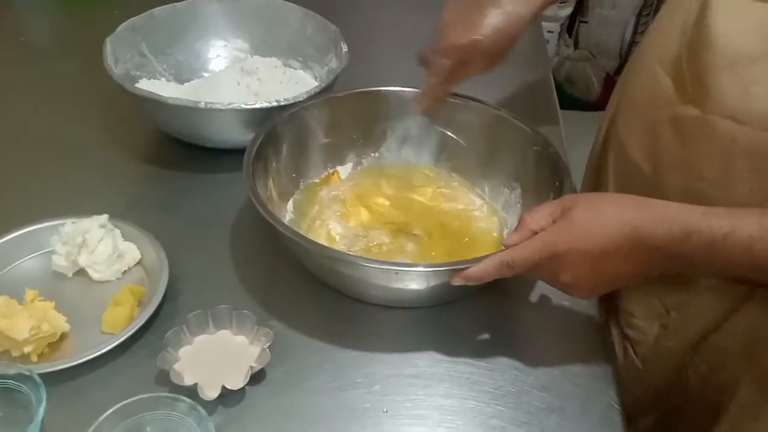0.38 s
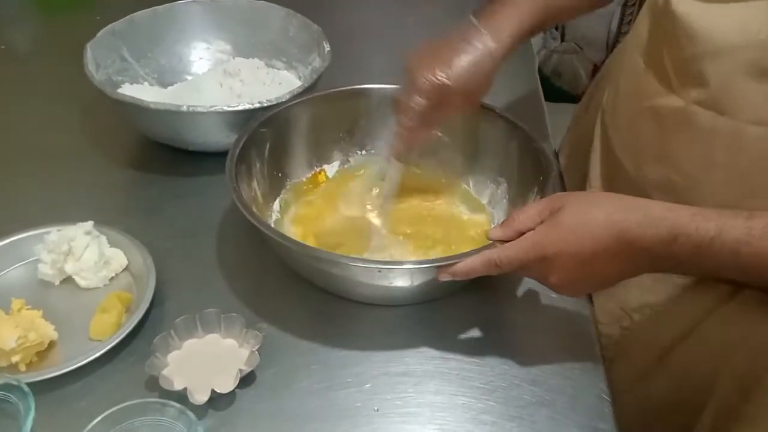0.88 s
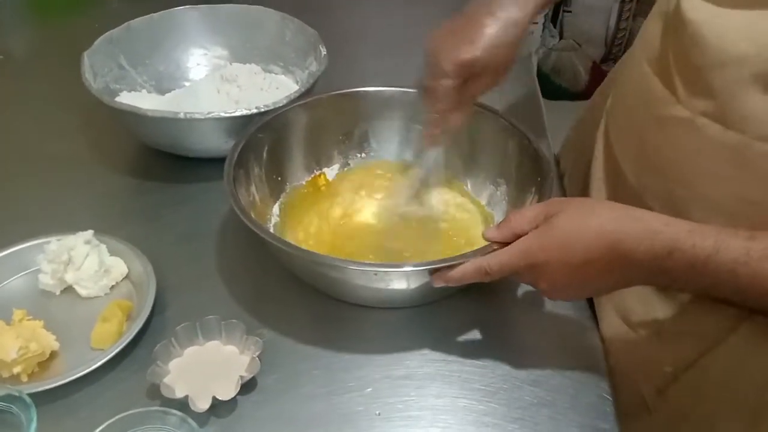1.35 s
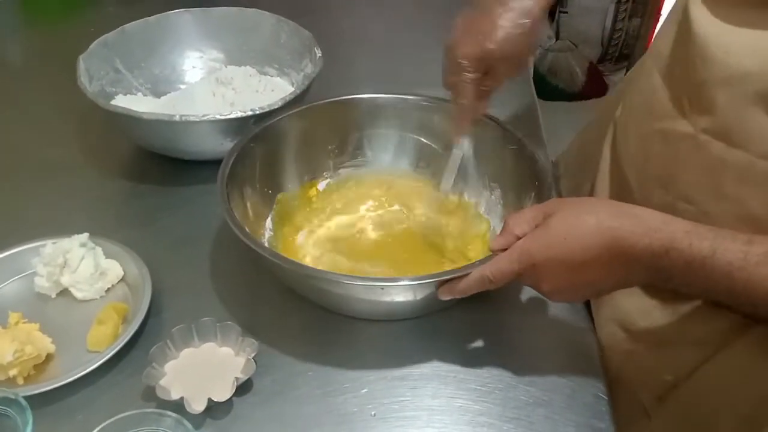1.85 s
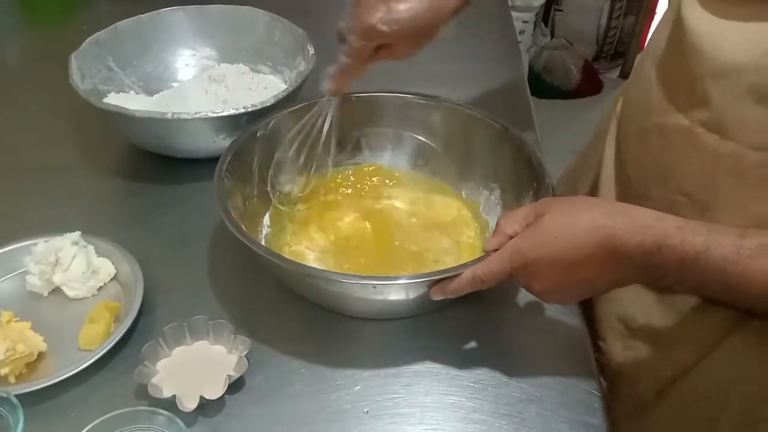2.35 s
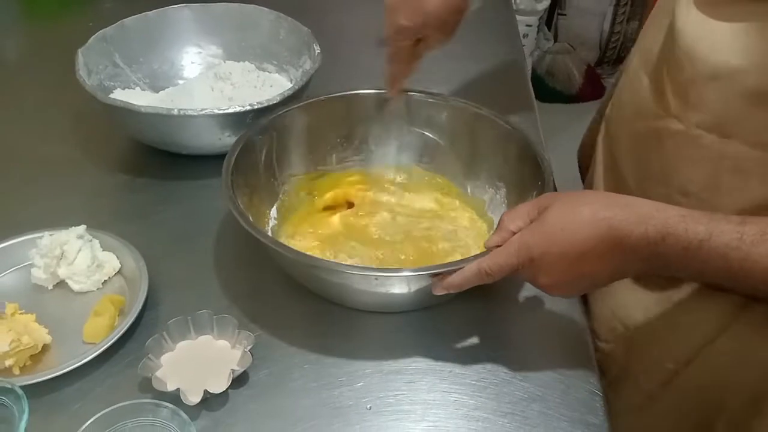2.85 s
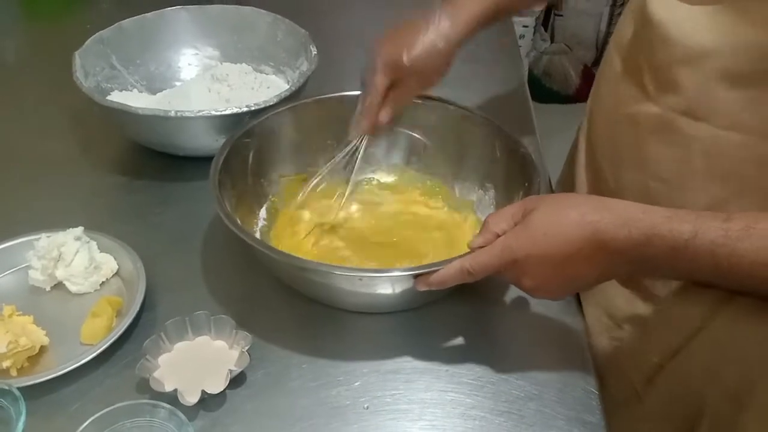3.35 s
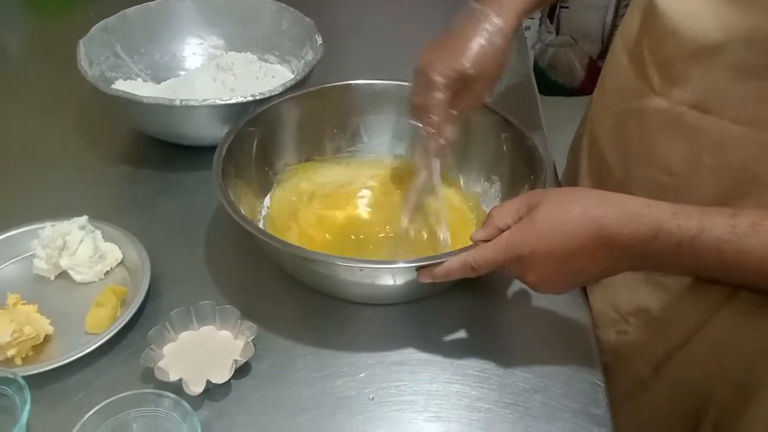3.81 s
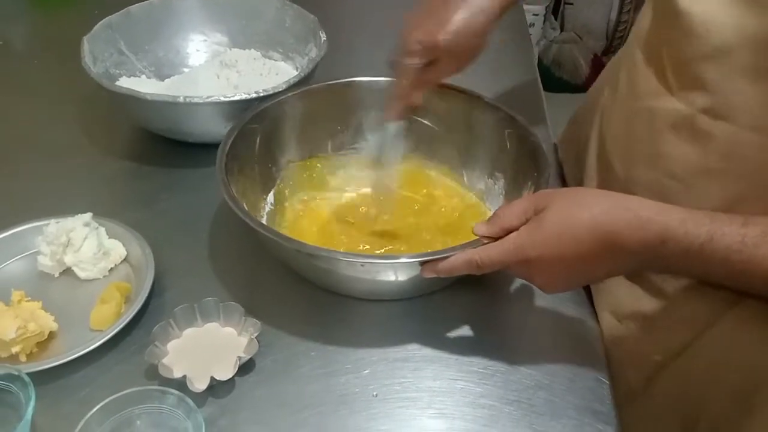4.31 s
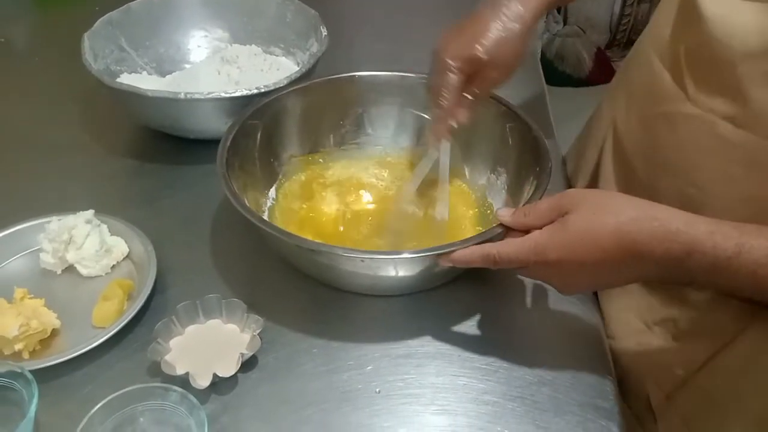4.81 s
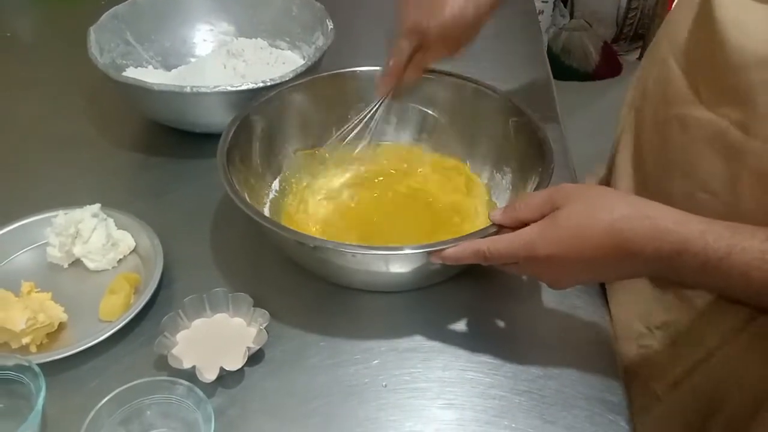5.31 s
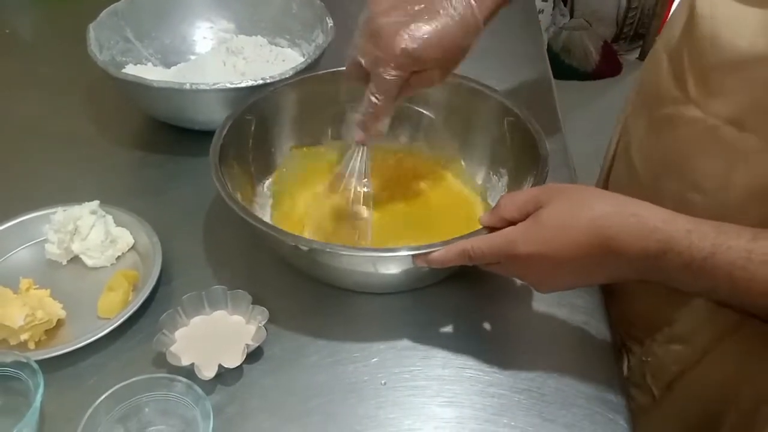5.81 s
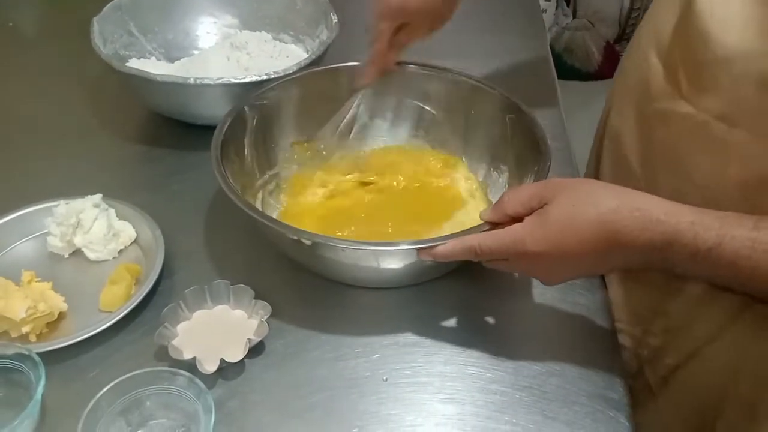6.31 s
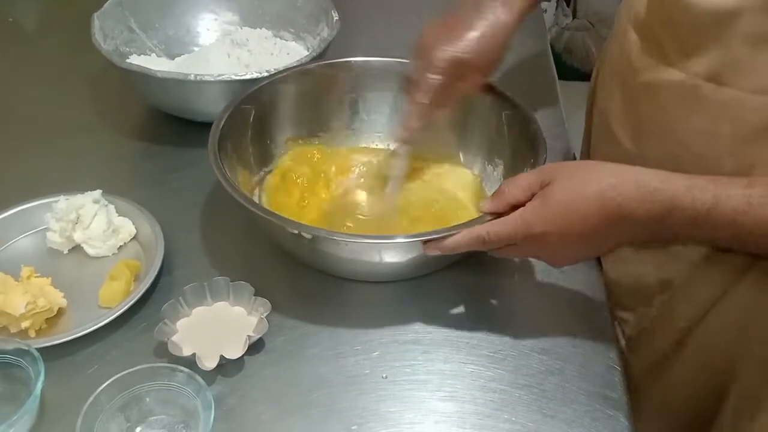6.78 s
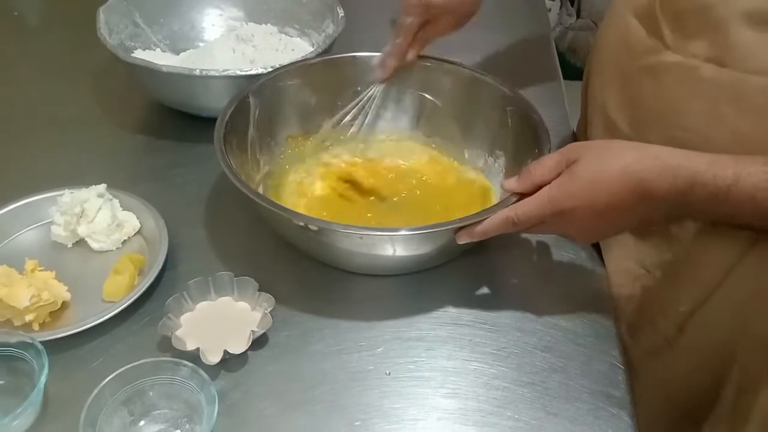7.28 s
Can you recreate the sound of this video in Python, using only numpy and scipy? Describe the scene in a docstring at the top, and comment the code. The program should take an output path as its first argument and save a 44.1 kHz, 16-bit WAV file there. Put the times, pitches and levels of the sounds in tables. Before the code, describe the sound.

Rapid close whisking in a metal bowl, wet slosh and bright ringing ticks, with a low engine swelling up in the last seconds.

```python
"""A wire whisk beats eggs fast in a steel bowl held on a steel table, heard close up.
Its wires hiss (shaped noise) and tick along the wall and knock it, setting short resonant modes ringing;
dragging wires sing, the egg sloshes and surges, and a few notes of the bowl stand out.
Something squeaks thinly (a sine and its octave) over a room murmur, and outside a slow engine idles,
then revs and swells as it comes by: pulses and noise through exhaust and pipe resonances."""
import sys
import numpy as np
from scipy import signal
from scipy.fft import rfft, irfft, next_fast_len
from scipy.io import wavfile
from scipy.ndimage import uniform_filter1d

SR = 44100
rng = np.random.default_rng(int(sys.argv[2]) if len(sys.argv) > 2 else 0)


def undo_db(level):
    """Turn decibels back into plain size, where 20 dB means ten times bigger."""
    steps = np.asarray(level, float) / 20
    return 10 ** steps


def put_to_file(sound):
    """Save the sound as 16-bit audio at rate SR, in the file named by the first command-line argument."""
    columns = np.atleast_2d(sound).T  # one column per channel
    safe = np.clip(columns, -1, 1)
    whole_steps = np.round(safe * 32767)
    wavfile.write(sys.argv[1], SR, whole_steps.astype(np.int16))


N = 326781  # samples

# Knocks of the wires on the wall: [t/s, relative level/dB, lower ring f/Hz, upper ring f/Hz,
# how long the wires keep landing/s (held within 0.002 to 0.025)]
KNOCK_EVENTS = [(0.061, -8.5, 4230, 5860, 0.0054), (0.075, -15, 4230, 5630, 0.0051),
                (0.125, -7.5, 4900, 6420, 0.0052), (0.187, -16, 4600, 4880, 0.031),
                (0.234, -17.5, 1860, 3340, 0.0091), (0.332, -11.5, 4540, 5160, 0.011),
                (0.529, -11.5, 4020, 7740, 0.022), (0.5397, -12.5, 2360, 5670, 0.011),
                (1.671, -12, 4120, 6080, 0.012), (1.7686, -13.5, 4330, 5720, 0.015),
                (1.785, -11.5, 4260, 5770, 0.023), (1.8686, -13, 3830, 4900, 0.0037),
                (2.0702, 5.5, 3570, 5060, 0.0062), (2.331, -6, 5060, 5670, 0.022),
                (2.419, -16, 4270, 5300, 0.03), (2.446, -13.5, 4000, 5860, 0.033),
                (2.5807, 2.5, 5540, 6130, 0.007), (2.628, -13, 4340, 6400, 0.0028),
                (2.64, -6, 4030, 5900, 0.0069), (2.715, -14.5, 3870, 5450, 0.015),
                (2.764, -6, 4420, 5640, 0.033), (2.866, -34, 4300, 7600, 0.0036),
                (2.8966, -13.5, 4530, 5630, 0.03), (2.9274, -11.5, 2780, 6350, 0.034),
                (3.007, -13, 3660, 5270, 0.004), (3.078, -12, 3330, 8800, 0.0059),
                (3.108, -16, 3360, 5500, 0.0064), (3.135, -15.5, 5160, 5200, 0.014),
                (3.7505, -12.5, 2287, 5270, 0.0094), (3.929, -8, 4300, 5320, 0.0018),
                (3.971, -10.5, 4030, 8000, 0.004), (4.0915, -14, 3050, 5700, 0.0039),
                (4.101, -11.5, 3050, 3960, 0.0022), (4.2207, -18, 3300, 5050, 0.015),
                (5.1115, -13.5, 3670, 5200, 0.0037), (5.217, -14, 4470, 5430, 0.0095),
                (5.365, -6.5, 5100, 5200, 0.023), (5.383, -6, 5070, 8180, 0.012),
                (5.7175, -6.5, 4240, 5000, 0.01), (5.7307, 0.5, 4250, 8200, 0.0062),
                (5.7392, 1, 4300, 5250, 0.0071), (5.746, 0, 3150, 5250, 0.0071),
                (5.956, -9, 4490, 4890, 0.0041), (6.001, -6, 6260, 7650, 0.0065),
                (6.028, -10.5, 5360, 5400, 0.025), (6.049, -10, 4850, 5100, 0.0094),
                (6.063, -13, 4220, 5700, 0.0073), (6.129, -22, 3040, 4940, 0.01),
                (6.264, -12, 5350, 5860, 0.027), (6.301, -11.5, 5050, 5760, 0.0075),
                (6.4357, -15, 4075, 5660, 0.01), (6.742, -16, 3050, 4800, 0.0051),
                (6.81, -6.5, 5240, 5580, 0.0041), (7.233, -14.5, 1960, 5170, 0.0051),
                (7.341, -15, 1850, 5130, 0.017), (7.383, -16, 4100, 4850, 0.036)]
# Small patches of wall radiate little bass: [f/Hz, level/dB]
SMALL_PATCH = [(900, -26), (2700, 0)]


def evened(x):
    """Scaled to rms 1."""
    return x / np.sqrt(np.mean(x ** 2) + 1e-20)


def read(points, hz):
    """A spectrum table read on a log-frequency axis."""
    f, value = np.transpose(points)
    return np.interp(np.log(hz + 1), np.log(f + 1), value)


def coloured(x, points):
    """x filtered by a spectrum table."""
    size = next_fast_len(len(x) + 4096)
    gain = undo_db(read(points, np.fft.rfftfreq(size, 1 / SR)))
    return irfft(rfft(x, size) * gain, size)[:len(x)]


def ring(x, hz, width):
    """A two-pole resonance, width in Hz: an impulse of 1 rings with height 1."""
    r, w = np.exp(-np.pi * width / SR), 2 * np.pi * hz / SR
    return signal.lfilter([np.sin(w)], [1, -2 * r * np.cos(w), r * r], x)


def sway(x, hz, width):
    """A resonance whose pitch follows the curve hz: an impulse of 1 rings with height 1."""
    turn = np.exp(2j * np.pi * np.cumsum(hz) / SR)
    return (turn * signal.lfilter([1], [1, -np.exp(-np.pi * width / SR)], x / turn)).real


def wander(seconds):
    """Random values of spread 1, a new one every so many seconds, joined by lines."""
    return np.interp(np.arange(N) / SR / seconds, np.arange(2000), rng.standard_normal(2000))


def murmur(db=-42):
    """The room's murmur: steady coloured noise."""
    # Murmur spectrum: [f/Hz, relative level/dB]
    room_colour = [(15, -58), (25, -10), (107, 4), (308, 5), (981, -8), (1820, 4), (2500, -9), (4300, 10),
                   (7960, -6), (9000, 1), (11700, -36.5), (19800, -120)]
    return undo_db(db) * evened(coloured(rng.standard_normal(N), room_colour))


def kitchen(x, db=-12, t60=0.18):
    """Sparse reflections of random sign, one in every 20 samples, falling 60 dB in t60 seconds."""
    taps = np.zeros(SR // 2)
    at = np.arange(200, len(taps) - 20, 20)
    sign = rng.choice([-1, 1], len(at))
    taps[at + rng.integers(0, 20, len(at))] = sign * undo_db(-60 * at / SR / t60)
    return undo_db(db) * signal.fftconvolve(x, taps / np.linalg.norm(taps))[:N]


def engine(pipe_hz=800, pipe_width=75, waver=0.026):
    """A strong and a weak puff each cycle thump in the exhaust; the gas whistles breathily in the pipe."""
    # Engine levels: [t/s, thump level/dB, upper thump share/dB as it nears, pipe whistle level/dB]
    engine_levels = [(0, -50.5, -15, -74), (1.0, -56, -12, -68), (3.0, -47, -14, -60),
                     (4.65, -49.5, -6.5, -58), (5.0, -46.5, 10.5, -71), (5.35, -44, 14, -43),
                     (5.75, -39, 12, -40), (6.2, -38, -3, -36.5), (6.6, -39, -2, -41),
                     (6.9, -38.5, -5, -67), (7.41, -46, -10.5, -68)]
    # Idling, then revved: [t/s, cycle rate f/Hz]
    cycle_rate = [(0, 5.14), (4.75, 5.14), (5.0, 18.8), (5.6, 18.7), (5.8, 18.4), (7.41, 18.7)]
    # Exhaust resonances, lowest first, then the upper ones: [f/Hz, width/Hz, relative level/dB]
    exhaust_modes = [(106, 48, 0), (140, 50, 0), (185, 60, -6), (235, 60, -11)]
    t = np.arange(N) / SR
    s, *columns = np.transpose(engine_levels)
    thump_db, upper_db, pipe_db = (np.interp(t, s, c) for c in columns)
    rate = np.interp(t, *np.transpose(cycle_rate))
    halves = np.floor(2 * (np.cumsum(rate * (1 + .02 * wander(.15))) / SR + .96))  # two puffs a cycle
    uneven_db = -.85 * rate * (halves % 2) + 2.5 * rng.standard_normal(N)  # no two firings alike
    puffs = evened(np.diff(halves, prepend=1) * undo_db(uneven_db))
    gas = (.35 + .03 * rate) * rng.standard_normal(N)  # more gas at speed
    # soft puffs; an open pipe gives no deep bass
    drive = np.diff(uniform_filter1d(puffs + gas, size=140), n=2, prepend=[0, 0])
    low, *upper = (undo_db(db) * evened(ring(ring(drive, hz, width), hz, width))
                   for hz, width, db in exhaust_modes)
    pipe = rng.standard_normal(N)
    drift = pipe_hz * (1 + waver * wander(.12))
    pipe = sway(sway(pipe, drift, pipe_width), drift, pipe_width)
    thump = low + undo_db(upper_db) * evened(sum(upper))
    return undo_db(thump_db + 2.7 * wander(.07)) * thump + undo_db(pipe_db) * evened(pipe)


def squeaks(hz=1812, octave_db=-13, waver_db=3, waver_hz=8, grow_db=4, rise_s=0.038, fall_s=0.035):
    """A thin whistle that grows a little and stops, with a weaker octave."""
    # Squeaks: [start t/s, length/s, level towards the end/dB]
    squeak_events = [(0.034, .1, -32), (1.002, 0.26, -30), (2.416, 0.16, -35)]
    level = np.zeros(N)
    for s, length, db in squeak_events:
        t = np.arange(0, length, 1 / SR)
        edges = np.clip(np.minimum(t / rise_s, (length - t) / fall_s), 0, 1)
        level[round(s * SR):][:len(t)] = undo_db(db + grow_db * (t / length - 1)) * edges ** 2.2
    turn = 2 * np.pi * np.cumsum(hz + waver_hz * wander(0.11)) / SR
    tone = np.sin(turn) + undo_db(octave_db) * np.sin(2 * turn)
    return np.sqrt(2) * level * undo_db(waver_db * wander(0.047)) * tone


def stroke_db(hz, t):
    """The stroke's level at one frequency: the sweeps rise, fall and add up; wall, body and slosh blend."""
    # Sweeps of the whisk round the bowl: [peak t/s, time to fall 10 dB/s (at least 0.005),
    # wires on the wall level/dB, bowl body level/dB, low slosh level/dB]
    sweep_events = [(.08, -1, -43, -44, -49), (0.228, 0, -26, -56, -61), (0.251, 0.14, -37, -35.5, -43),
                    (0.352, 0.06, -29, -50, -46), (0.409, 0.09, -34.5, -35.5, -38),
                    (0.539, 0.07, -28.5, -28, -37.5), (0.78, 0.0559, -29.5, -27.5, -40),
                    (0.908, 0.14, -33, -31, -38.5), (1.06, 0.46, -39, -37, -52),
                    (1.25, 0.14, -36.5, -35, -44), (1.311, 0.03, -37, -33, -42),
                    (1.365, 0.03, -26.5, -24, -34), (1.48, 0.1, -37.5, -36.5, -45.5),
                    (1.591, 0.04, -35.5, -33.5, -36), (1.69, -0.6, -53, -40.5, -59),
                    (1.79, -0.03, -35, -70, -73), (1.945, 0.06, -32.5, -35, -40.5),
                    (2.025, 0.07, -33, -32, -30), (2.077, 0.0244, -17, -26.5, -38),
                    (2.11, 0.15, -33.5, -31.5, -34.5), (2.344, 0.09, -30.5, -31, -47),
                    (2.59, -0.53, -29, -55, -66), (2.62, 0.03, -17, -54, -63), (2.69, 0.1, -47, -41, -44),
                    (2.731, -0.04, -22.5, -39, -70), (2.773, -0.09, -16.5, -40, -68),
                    (2.905, -1.17, -28, -56, -64), (2.944, 0.0366, -18.5, -35.5, -71),
                    (3.01, 0.0042, -23, -31, -27), (3.04, 0.03, -25, -28.5, -32),
                    (3.111, 0.04, -24.5, -30, -32), (3.237, 0.08, -26, -30, -38.5),
                    (3.402, 0.03, -22.5, -29.5, -28), (3.458, 0.0362, -29, -28.5, -27),
                    (3.551, 0.03, -29.5, -35, -28), (3.598, 0.0371, -25, -21.5, -36.5),
                    (3.7, 0.05, -30.5, -29.5, -32.5), (3.765, 0.0361, -27, -17.5, -50),
                    (3.82, 0.09, -32.5, -26, -28), (3.925, 0.0645, -26, -26.5, -40),
                    (4.02, 0.13, -37, -32, -37.5), (4.105, 0.03, -25.5, -34.5, -37),
                    (4.236, 0, -30, -34, -38), (4.29, -0.1, -36, -27.5, -31),
                    (4.402, 0.16, -37.5, -42, -33.5), (4.465, 0.0662, -32.5, -26, -29),
                    (4.63, 0.11, -31.5, -32, -37.5), (4.76, 0.13, -29, -33.5, -31.5),
                    (4.87, 0.07, -33, -37, -43), (4.99, 0.05, -33.5, -30, -31),
                    (5.07, 0.1, -28, -39, -31.5), (5.15, 0.07, -29, -39.5, -51),
                    (5.23, 0.05, -41, -41.5, -56), (5.342, 0.08, -27, -31, -30),
                    (5.388, 0.01, -19.5, -31, -49), (5.526, 0.07, -27.5, -30, -31.5),
                    (5.581, 0.04, -31.5, -26.5, -41), (5.65, 0.06, -36, -28, -32),
                    (5.754, 0.0272, -14.5, -21.5, -31), (5.96, 1.4, -40, -69, -40.5),
                    (6.214, 0.06, -23.5, -45, -49), (6.25, 0.03, -28, -29.5, -57),
                    (6.289, 0, -22, -32, -27), (6.387, -0.0238, -59, -16.5, -29.5),
                    (6.453, 0.07, -25, -28, -32.5), (6.575, 0.02, -23.5, -36, -29),
                    (6.7, 0.03, -38, -30.5, -39), (6.769, -0.05, -35, -23, -41.5),
                    (6.817, 0.03, -18.5, -26, -34), (6.87, 0, -55, -25, -41), (7.019, 0.21, -55, -33, -33),
                    (7.11, 0.24, -37.5, -52, -40.5), (7.238, 0.06, -30.5, -23, -36.5),
                    (7.34, 0.05, -33, -27, -34.5), (7.393, 0.0434, -17, -20.5, -30.5)]
    # Where wall, body and slosh act: [f/Hz]
    part_hz = (5500, 2000, 700)
    # Wall, body and slosh between sweeps: [level/dB]
    rest_levels = (-56.5, -56.5, -64)
    rise_share = 0.86  # a sweep rises in this share of its fall
    s, fall_s, *columns = np.transpose(sweep_events)
    grid = np.arange(0, N / SR + .1, .004)
    late = (grid[:, None] - s) / np.maximum(fall_s, .005)
    shape = undo_db(-20 * np.maximum(late, -late / rise_share))  # as power
    levels = [10 * np.log10(shape @ undo_db(2 * c) + undo_db(2 * rest)) for c, rest in zip(columns, rest_levels)]
    share = [np.interp(-np.log(hz), -np.log(part_hz), row) for row in np.eye(3)]
    return sum(np.multiply.outer(part, np.interp(t, grid, level)) for part, level in zip(share, levels))


def surges(early=0.62, sag=1.05, splash_db=3):
    """Noise in a narrow sliding band, as the hollow above the egg changes; it swells, splashes and ebbs."""
    # The egg surges round the bowl and its hollow colour slides:
    # [start t/s, length/s, from f/Hz, to f/Hz, relative level/dB, width as a share of the mean pitch]
    surge_events = [(1.255, 0.072, 1294, 1205, -34, 0.32), (1.997, 0.13, 322, 340, -39.5, 0.33),
                    (2.66, 0.04, 596, 1620, -39, 0.17), (2.911, 0.14, 2907, 1168, -29.5, 0.38),
                    (3.388, 0.208, 590, 511, -38.5, .3), (4.061, .12, 3020, 3000, -31, 0.27),
                    (4.526, 0.21, 1950, 1950, -34, 0.19), (4.619, 0.083, 3130, 3010, -35, 0.18),
                    (4.61, 0.407, 331.4, 377.5, -42.5, 0.18), (6.751, 0.16, 966, 1302, -38.5, 0.24)]
    out = np.zeros(N)
    for s, length, from_hz, to_hz, db, width_share in surge_events:
        u = np.arange(0, length, 1 / SR) / length
        hz = from_hz * (to_hz / from_hz) ** (u ** sag)
        pole = np.exp(-np.pi * width_share * hz.mean() / SR)
        noise = (rng.standard_normal(SR // 2) + 1j * rng.standard_normal(SR // 2))[:len(u)]
        band = signal.lfilter([1], [1, -2 * pole, pole ** 2], noise)
        band = (band * np.exp(2j * np.pi * np.cumsum(hz) / SR)).real
        swell = np.sin(np.pi * u ** early)  # fullest a third of the way in
        out[round(s * SR):][:len(u)] += undo_db(db) * swell * evened(band)
    return out * undo_db(splash_db * wander(.015))


def slosh(db=-8, per_s=11, spread_db=4.5, low_hz=560, high_hz=4500, cycles=18):
    """Pockets of air folded into the egg: short soft notes that bend a little, per_s at each pitch."""
    t, out = np.arange(N) / SR, np.zeros(N)
    for hz in np.geomspace(low_hz, high_hz, num=24):
        u = np.arange(int(6 * cycles * SR / hz / 2)) * hz / SR / cycles
        bend = 1 + rng.uniform(-.04, .04) * u
        note = u * np.exp(1 - 3 * u) * 3 * np.sin(2 * np.pi * cycles * u * bend)
        births = rng.random(N) < per_s / SR
        births = births * undo_db(spread_db * rng.standard_normal(N) + stroke_db(hz, t))
        out += signal.oaconvolve(births, note)[:N]
    return undo_db(db) * out


def notes(swell_s=.015, waver_db=3.5, rough=.05, clean_hz=450):
    """Each note swells as the wires sweep over its belly; the higher it lies, the rougher it is."""
    # Moments when the stroke makes one note of the bowl stand out: [t/s, relative level/dB, f/Hz]
    note_events = [(0.243, -23.5, 1780), (0.28, -35.5, 854), (0.29, -37, 334), (0.544, -31, 1813),
                   (0.548, -38, 1083), (0.553, -28, 2455), (1.397, -28, 1180), (2.016, -28, 1222),
                   (2.14, -29.5, 2070), (2.366, -34.5, 1315), (3.133, -34, 568), (3.14, -29.5, 1206),
                   (3.402, -33, 617), (3.727, -33, 560), (3.756, -28, 2270), (4.027, -33.5, 590),
                   (4.466, -28, 1225), (4.475, -25, 579), (4.48, -30.5, 694), (4.615, -36, 706),
                   (5.4, -28, 1385), (5.522, -30.5, 1345), (5.597, -31, 710), (5.645, -30, 1110),
                   (5.86, -28, 3090), (6.256, -29, 1990), (6.404, -22.5, 1403), (6.425, -28.5, 354),
                   (6.43, -27, 840), (6.44, -28.5, 680), (6.569, -29.5, 1956), (7.024, -34.5, 654),
                   (7.244, -26, 2094), (7.249, -27, 708)]
    out, t = np.zeros(N + 6000), np.arange(6000) / SR
    swell = t / swell_s * np.exp(1 - t / swell_s)
    for (s, db, hz), (a, b) in zip(note_events, rng.standard_normal((len(note_events), 2, 8000))):
        scrape = signal.lfilter([1], [1, -np.exp(-np.pi * rough * hz / SR)], a + 1j * b)[-len(t):]
        scrape = scrape / np.std(scrape) + clean_hz / hz  # noise plus a steady part
        tone = (scrape * np.exp(2j * np.pi * hz * t)).real / np.hypot(1, clean_hz / hz)
        out[round((s - 1.3 * swell_s) * SR):][:len(t)] += undo_db(db) * swell * tone
    return out[:N] * undo_db(waver_db * wander(0.026))


def drags(db=-3, split_hz=85, width=95, slips_per_s=250, catch=0.07, fade_db=-20, climb=0.033,
          upper=1.22, upper_db=-7):
    """Slips of dragging wires keep two close pairs of wall modes singing; they beat, climb and fade."""
    # The wires drag on the dry upper wall and it sings: [start t/s, length/s, relative level/dB, f/Hz]
    drag_events = [(0.052, 0.15, -39, 4370), (0.323, 0.11, -21, 4450), (1.662, 0.066, -22, 4290),
                   (1.777, 0.079, -17.5, 4250), (2.459, 0.065, -19.5, 4290), (2.569, 0.012, -1, 4250),
                   (2.583, 0.17, -19.5, 4253), (2.702, .32, -24, 4290), (5.952, 0.034, -9, 4520),
                   (5.999, 0.22, -15, 4180), (6.251, 0.12, -21, 5600)]
    out = np.zeros(N)
    for s, length, peak_db, hz in drag_events:
        t = np.arange(0, length, 1 / SR)
        slips = rng.standard_normal((4, SR // 2)) + 1j * rng.standard_normal((4, SR // 2))
        slips = (slips * (rng.random((4, SR // 2)) < slips_per_s / SR))[:, :len(t)]
        pole = np.exp(-np.pi * width / SR)
        swing = signal.lfilter([1], [1, -2 * pole, pole ** 2], slips)
        four = np.outer([1, upper], [hz - split_hz, hz + split_hz]).ravel()
        swing *= undo_db([[0], [0], [upper_db], [upper_db]])
        turn = 2j * np.pi * np.outer(four, t * (1 + climb * t / length / 2))
        song = (swing * np.exp(turn)).real.sum(0)
        shape = np.minimum(t / length / catch, 1) * undo_db(fade_db * (t / length) ** 1.37)  # catches fast
        out[round(s * SR):][:len(t)] += undo_db(db + peak_db) * shape * evened(song)
    return out


def landing(length_s, rise_s=.0005):
    """Envelope of several wires landing one after another."""
    t = np.arange(3000) / SR
    return (1 - np.exp(-t / rise_s)) * np.exp(-t / np.clip(length_s, .002, .025))


def cracks(db=-13, spot_db=-8, spot_width=170):
    """Each knock throws a broad crack, and the struck spot clinks briefly on its own two pitches."""
    burst, spots, grit = np.zeros(N + 3000), np.zeros(N + 3000), rng.standard_normal(N + 3000)
    for s, peak_db, lower_hz, upper_hz, length_s in KNOCK_EVENTS:
        at = int(s * SR)
        part = undo_db(peak_db) * landing(length_s) * grit[at:][:3000]
        burst[at:][:3000] += part
        clink = ring(part, lower_hz, spot_width) + ring(part, upper_hz, spot_width)
        spots[at:][:3000] += clink * np.sqrt(spot_width / SR)
    broad = coloured(burst[:N], [(1000, -64), (3200, -11), (4200, 10.0), (6200, 9.0), (9000, -9.0)])
    return undo_db(db) * broad + undo_db(spot_db) * coloured(spots[:N], SMALL_PATCH)


def bowl(rub_db=-38, ticks_per_s=600, tick_spread_db=5, place_db=8, place_s=.045, knock_db=-12,
         reach=0.045, load=0.0128):
    """Ticks of the sliding wires and the knocks ring the modes; the moving contact favours changing modes."""
    # What the bowl rings with: [f/Hz, relative level/dB, nominal t60/s (60 dB down in 0.84 of it)]
    modes = [(590, -8.5, 0.15), (679, 2.5, 0.058), (880, 3, 0.052), (1072, -5.5, 0.18), (1160, -1.5, 0.13),
             (1410, 1, 0.076), (1855, 2.5, 0.14), (1960, 7, 0.042), (2070, 2, 0.043), (2350, -3.5, 0.19),
             (3050, 4.5, 0.053), (3187, 3, 0.055), (3570, 0, 0.053), (3900, 0.5, 0.082), (4230, -4, 0.14),
             (4300, -21, 0.071), (4850, -16.5, 0.096), (5270, 2.5, 0.043), (5128, 1.5, 0.087),
             (5720, -1, 0.07), (6280, -8.5, 0.19), (6870, -19, 0.033), (7590, -4, 0.071), (7960, 4, 0.023),
             (9100, 7.5, 0.026)]
    t = np.arange(N) / SR
    ticks = undo_db(tick_spread_db * np.minimum(rng.exponential(1, N), 4)) * (rng.random(N) < ticks_per_s / SR)
    ticks = evened(ticks * rng.choice([-1, 1], N))
    luck, grit = rng.standard_normal((len(KNOCK_EVENTS), len(modes))), rng.standard_normal(N)
    mode_hz = np.transpose(modes)[0]
    blows = np.zeros((len(modes), N + 3000))
    for (s, peak_db, lower_hz, upper_hz, length_s), chance in zip(KNOCK_EVENTS, luck):
        apart = np.minimum(abs(np.log(mode_hz / lower_hz)), abs(np.log(mode_hz / upper_hz)))
        near_db = -14 * np.minimum((apart / reach) ** 2, 1)  # the struck spot favours modes near its pitches
        low_db = -30 * np.clip(np.log(lower_hz / mode_hz) / 0.04, 0, 1)  # thin wires hardly move deeper modes
        shape = landing(length_s)
        size = undo_db(knock_db + peak_db + near_db + low_db + 3.4 * chance) / np.linalg.norm(shape)
        blows[:, int(s * SR):][:, :len(shape)] += np.outer(size, shape)
    body, wall = np.zeros((2, N))
    for (hz, db, t60), blow in zip(modes, blows):
        wet = np.clip(1.4 - hz / 2500, 0, 1)  # low modes are pushed smoothly through the egg
        rub_level = rub_db + stroke_db(hz, t) + place_db * np.minimum(wander(place_s), 1.5)
        rub = ((1 - wet) * ticks + wet * grit) * undo_db(rub_level)
        pitch = hz * (1 + load * wander(.06))  # the moving egg loads the wall
        part = wall if hz > 2800 else body
        part += undo_db(db) * sway(rub + grit * blow[:N], pitch, 2.62 / t60)
    return body + coloured(wall, SMALL_PATCH)


def hiss(db=1.5, patch_db=4, colour_db=3.5, flicker_db=3.5):
    """Wires rubbing: noise in short patches; the treble flickers as contact comes and goes."""
    # Colour of the rubbing wires: [f/Hz, relative level/dB]
    rub_colour = [(250, 1.5), (450, -3.5), (700, -6.5), (1300, 1), (2000, 2.5), (2700, 3.5), (4200, 1),
                  (5500, 0), (7000, -4.5), (8300, -4.5), (12000, -16)]
    frames, hz = N // 128 + 5, np.fft.rfftfreq(512, 1 / SR)
    a, b, patches, colour = rng.standard_normal((frames, 257, 4)).T  # each is frequency by time
    colour = evened(uniform_filter1d(uniform_filter1d(colour, size=9, axis=0), size=16, axis=1))  # broad shifts
    patches = evened(uniform_filter1d(uniform_filter1d(patches, size=2, axis=0), size=12, axis=1))
    flicker = evened(uniform_filter1d(rng.standard_normal(frames), size=2))
    flicker = np.outer(np.clip(hz / 4000, 0, 1), flicker)
    noise = a + 1j * b
    level = read(rub_colour, hz)[:, None] + patch_db * patches + colour_db * colour + flicker_db * flicker
    level = level + db + stroke_db(hz + 1, np.arange(frames) * 128 / SR)
    scale = 1 / np.std(signal.istft(noise, nperseg=512, noverlap=384)[1])
    return signal.istft(noise * undo_db(level) * scale, nperseg=512, noverlap=384)[1][:N]


def scene():
    """Whisk and bowl in the kitchen, over the room's murmur and the street."""
    whisk = hiss() + bowl() + cracks() + drags() + slosh() + notes() + surges()
    return (whisk + kitchen(whisk) + squeaks() + engine() + murmur())[None]


def roll_off(x):
    """The treble ends steeply here."""
    return signal.sosfilt(signal.butter(12, 15480, fs=SR, output="sos"), x)


def record(dry):
    """The input stage rounds off the hardest knocks; the chain thins deep bass and cuts treble above 8.4 kHz."""
    # Recording chain response: [f/Hz, level/dB]
    chain_response = [(20, -20), (60, -14), (85, -11), (110, -8), (8400, -0.5), (8900, -18.5),
                      (9500, -13.5), (10000, -26.5), (11900, -31), (12400, -64), (15000, -58)]
    rounded = .85 * np.tanh(dry[0] / .85)
    heard = coloured(rounded, chain_response)[None]
    return roll_off(heard)


dry = scene()
out = record(dry)
put_to_file(out)
```